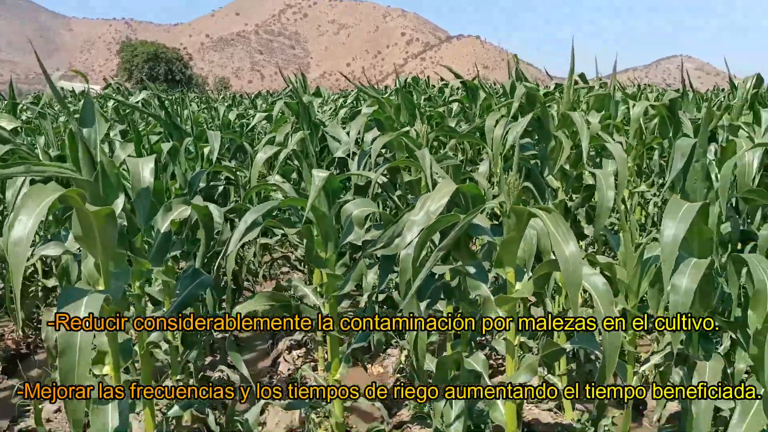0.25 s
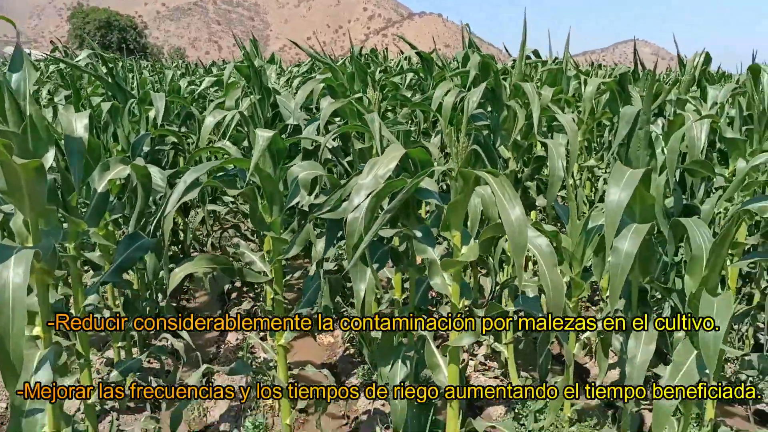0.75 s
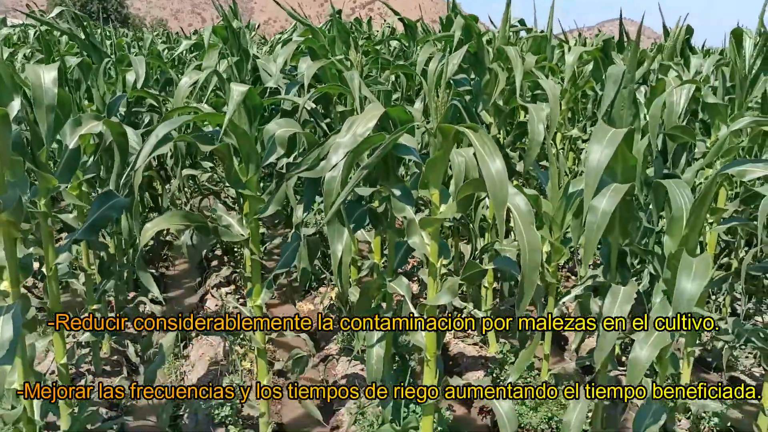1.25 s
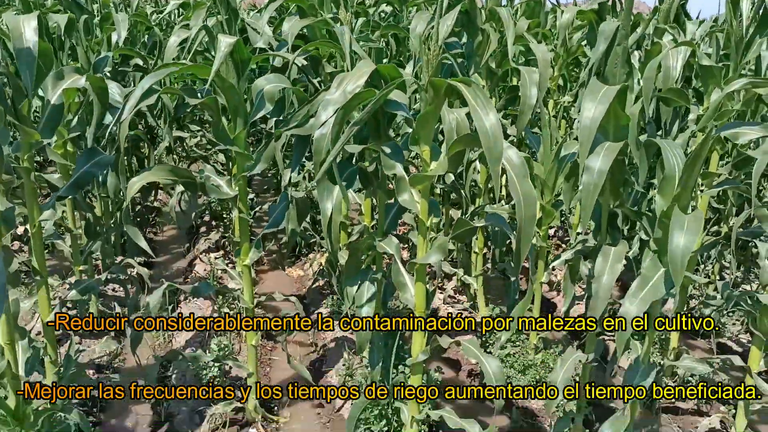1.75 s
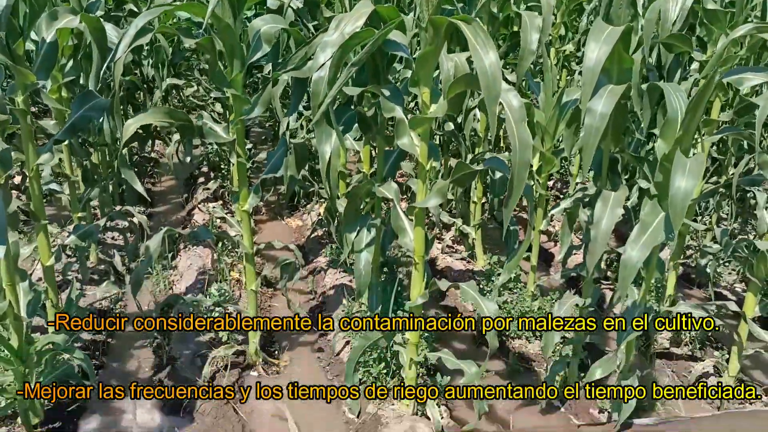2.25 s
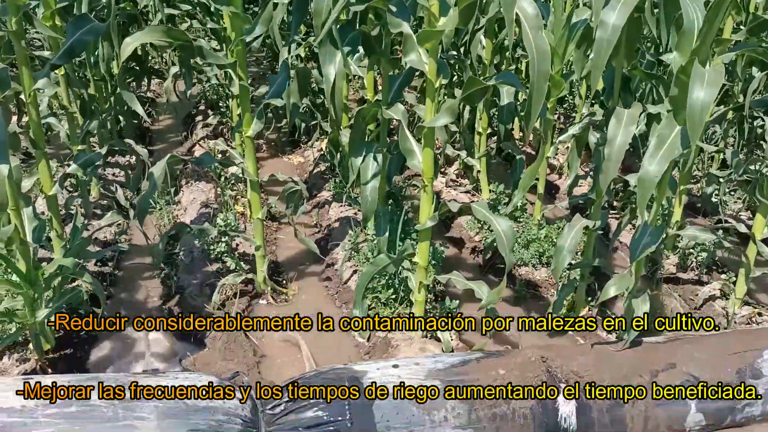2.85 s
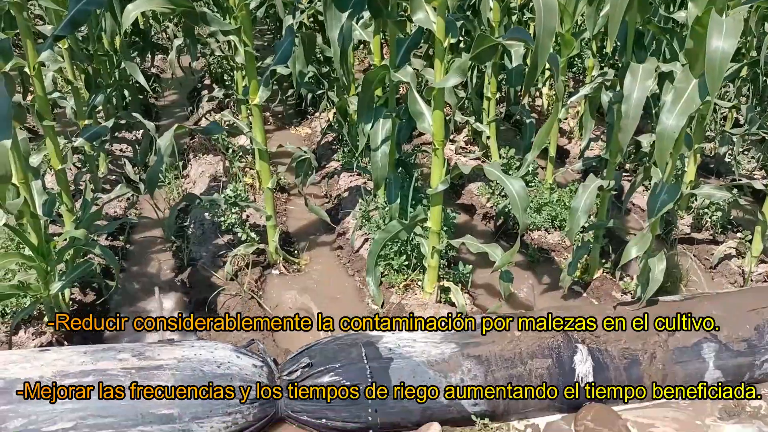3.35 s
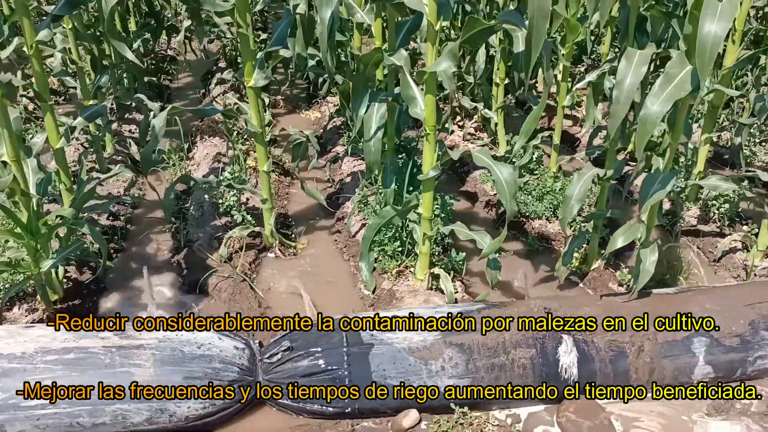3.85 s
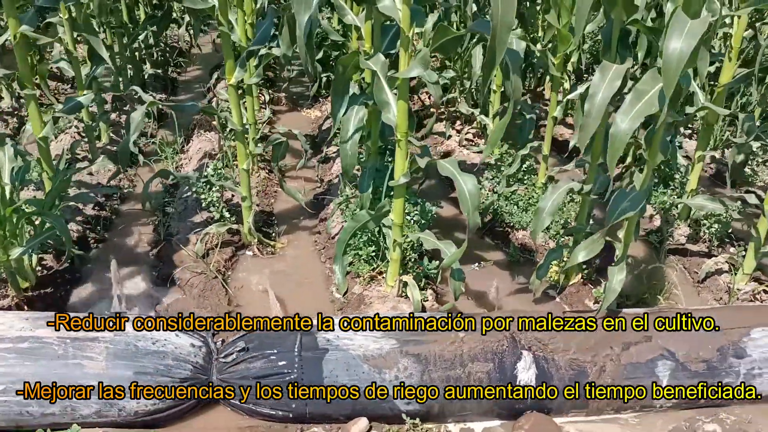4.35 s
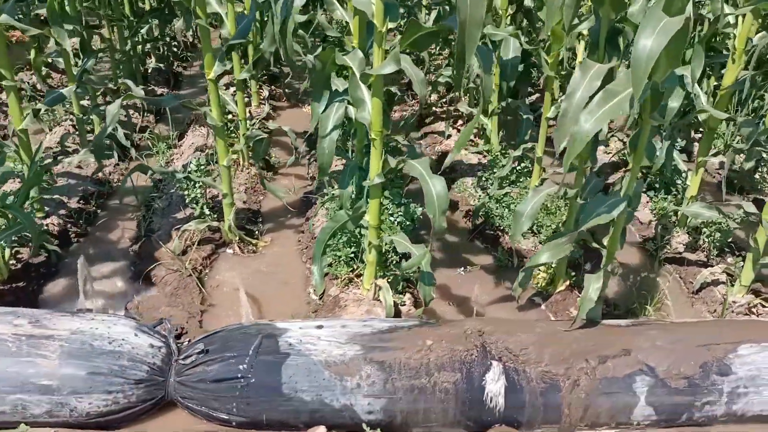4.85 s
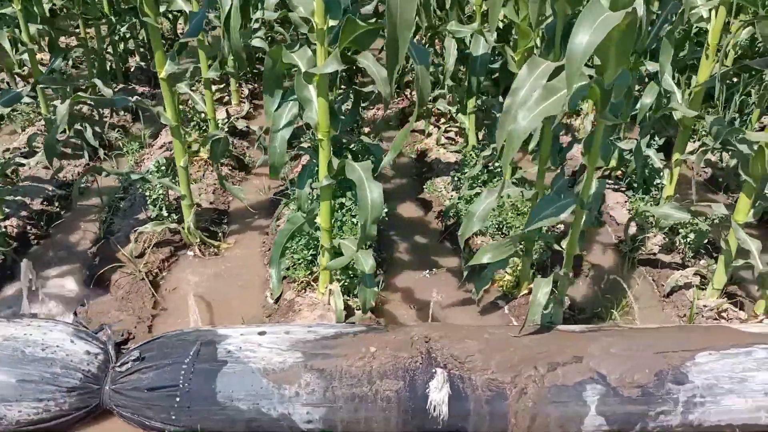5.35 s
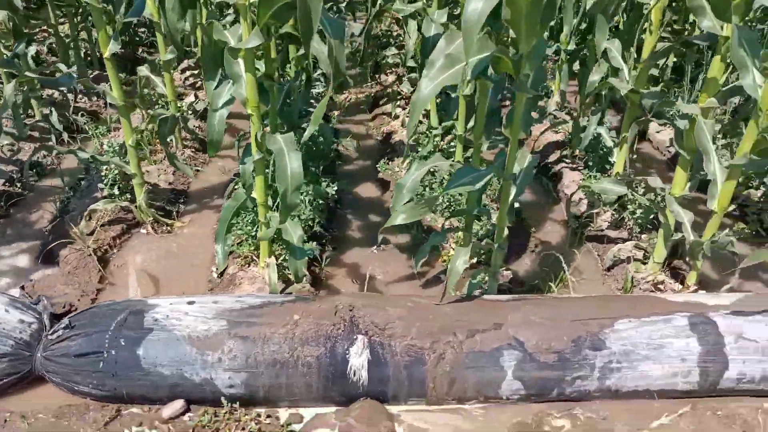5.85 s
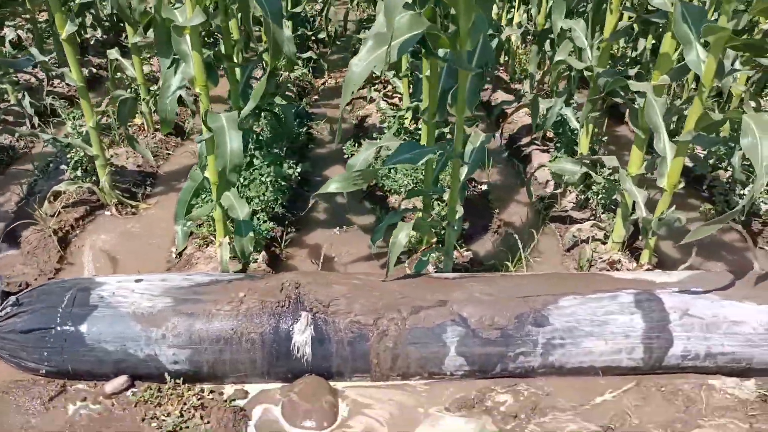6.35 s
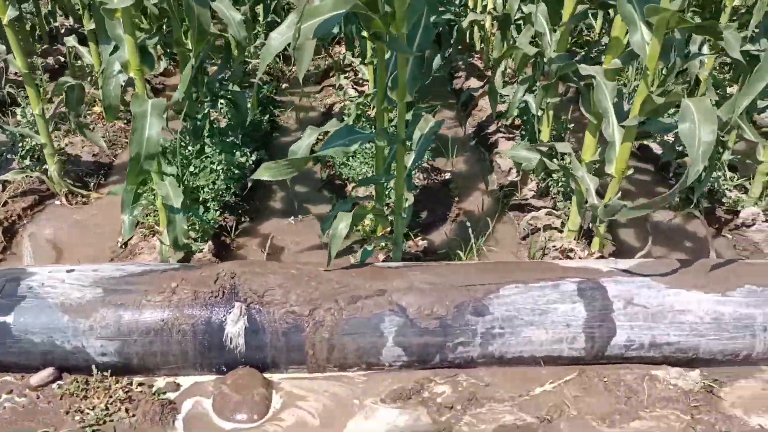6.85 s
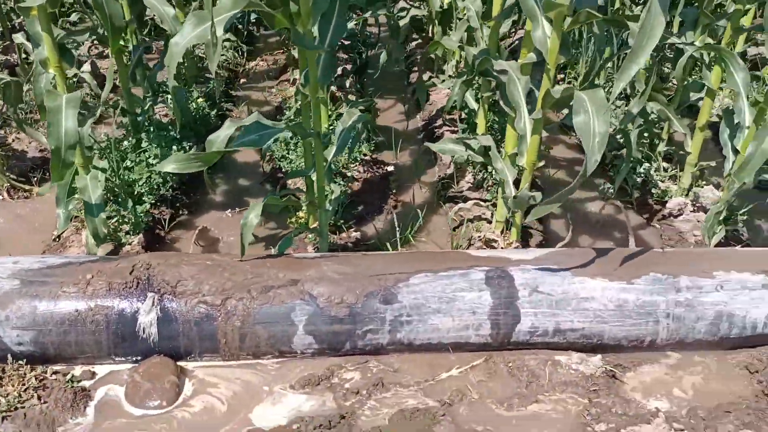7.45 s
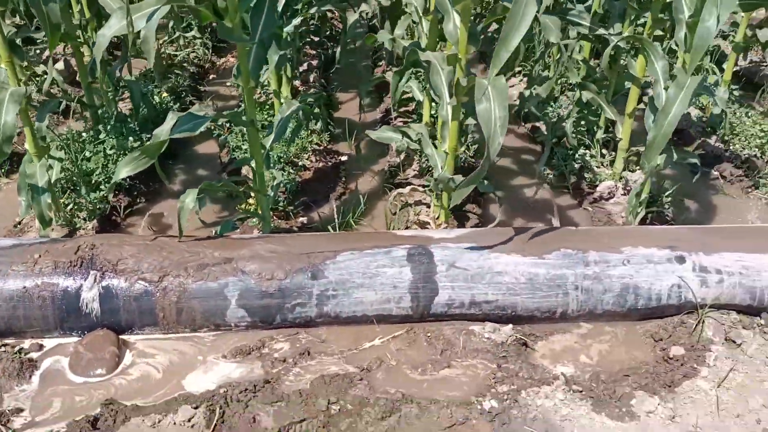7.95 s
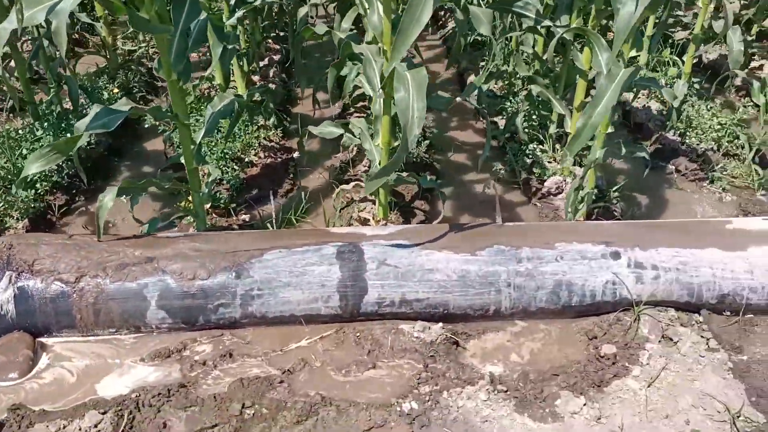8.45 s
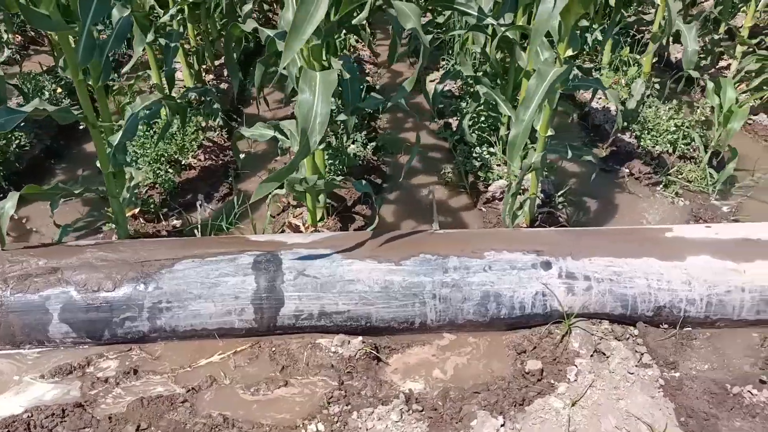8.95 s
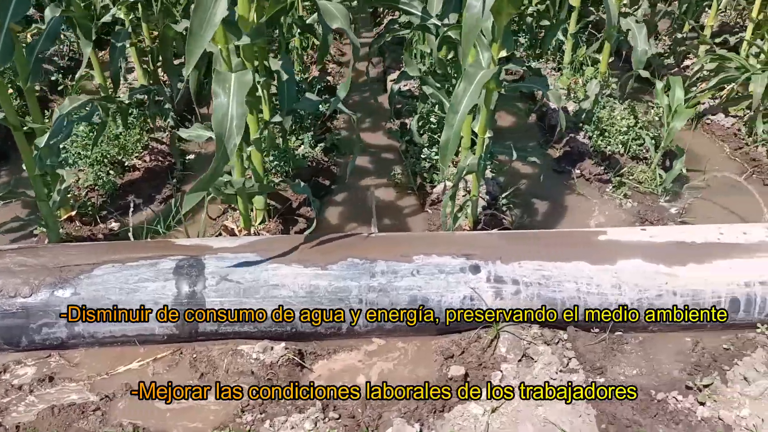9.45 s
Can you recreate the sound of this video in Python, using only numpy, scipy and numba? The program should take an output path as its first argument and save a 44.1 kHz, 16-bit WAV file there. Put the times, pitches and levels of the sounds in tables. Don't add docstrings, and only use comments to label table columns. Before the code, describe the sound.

Outdoors in a maize field, water sprays continuously from a soft irrigation pipe into muddy furrows: an even, bright hiss full of tiny ticks and trickling bubbles, with soft low gurgles beneath. Light wind flutters come early. From about five and a half to nearly eight seconds, strong gusts thud and rumble mostly in the right channel, then weaken while the water runs on. Handheld stereo phone, close, no windscreen.

```python
import sys
import numpy as np
from scipy import signal
from scipy.fft import rfft, irfft, next_fast_len
from scipy.io import wavfile
from scipy.ndimage import uniform_filter1d
from numba import njit

SR = 44100
rng = np.random.default_rng(int(sys.argv[2]) if len(sys.argv) > 2 else 0)


def dump_mix(stems):
    frames = np.atleast_2d(stems).T
    limited = np.clip(frames, -1, 1)
    pcm = np.round(limited * 32767).astype(np.int16)
    wavfile.write(sys.argv[1], SR, pcm)


def ratio_of_db(decibels):
    return 10 ** (np.asarray(decibels, float) / 20)


N = 428211
TIME = np.arange(N) / SR

# t/s, spray level/dB, spray left minus right/dB, gurgle level/dB
WATER_FLOW = [(0, -37.5, 1.5, -50), (1, -37.5, 2.5, -51), (2.4, -37, 1, -52), (3.5, -38, 1, -52.5),
              (4.5, -38, 0.5, -51.5), (5.5, -37.5, 0, -49), (6.5, -38.5, -0.5, -59), (7.5, -38, 0.5, -60),
              (8.5, -38.5, 0, -71), (9.3, -38, 0.5, -70), (9.55, -37.5, 0.5, -62), (9.71, -38, -1, -59)]
# f/Hz, level per Hz/dB
LEFT_PORT_COLOUR = [(150, -9.5), (900, -7.5), (1450, -7), (2250, 1), (2700, -2.5), (3600, -11), (4400, -8),
                    (5450, -8), (6400, -13.5), (8500, -13.5), (9600, -16.5), (12000, -15), (14500, -18),
                    (15600, -24)]
RIGHT_PORT_COLOUR = [(150, -7.5), (1000, -6.5), (1650, -9.5), (2200, -1.5), (2700, -3), (3100, 1.5),
                     (3600, -3.5), (4200, -2), (6500, -2.5), (8800, -6.5), (9800, -16), (11500, -12),
                     (14500, -18), (15600, -21)]
# f/Hz, common share/0-1
PORT_LIKENESS = [(150, 1), (700, 0.27), (1200, 0.15), (2500, 0.15), (5000, 0), (12000, 0.06)]
BREEZE_DB = (-68.5, -61)
# start t/s, hold/s, level/dB
LEFT_GUSTS = [(.2, .06, -55), (.66, 0.055, -59), (2.74, 0.26, -60), (3.42, 0.29, -51), (3.76, .08, -47),
              (3.92, .08, -55), (4.46, 0.13, -54), (4.72, 0.071, -48), (5.02, .05, -55), (5.4, 0.1, -55),
              (5.64, .06, -62), (6.44, .05, -52), (6.64, 0.066, -54), (6.86, 0.067, -39), (7.84, .14, -51),
              (8.42, .12, -45), (8.6, .2, -58), (8.84, 0.048, -47), (9.22, .1, -55), (9.6, 0.065, -57)]
RIGHT_GUSTS = [(.13, .19, -36), (.46, 0.15, -42), (.7, 0.45, -53.5), (1.25, 0.26, -44),
               (1.78, 0.023, -47.5), (2.97, .08, -46), (3.14, .3, -57), (4.3, 0.04, -42), (4.44, 0.15, -37),
               (4.65, 0.1, -43.5), (4.94, .1, -46), (5.17, .12, -40.5), (5.41, 0.25, -18.5),
               (5.75, .13, -18.5), (5.9, 0.074, -21), (6.05, 0.18, -23.5), (6.24, 0.13, -33.5),
               (6.39, 0.1, -23), (6.58, 0.19, -24), (6.84, 0.078, -42), (7.09, .24, -20),
               (7.38, 0.41, -20.5), (7.86, .2, -31), (8.44, 0.047, -36), (8.57, 0.028, -36.5),
               (8.65, 0.195, -34), (8.88, 0.16, -36.5), (9.12, 0.13, -38), (9.38, 0.11, -39.5),
               (9.53, .12, -36)]
# t/s, peak level/dB, f/Hz, length/ms
LEFT_BUFFETS = [(3.434, -35, 79, 7.6), (3.495, -28.5, 117, 5.6), (3.541, -26.5, 87.5, 8.7),
                (3.611, -35, 94, 4.7), (3.825, -31, 92.5, 8), (3.955, -21, 93, 3.7), (3.982, -32, 124, 3.3),
                (4.485, -29, 77, 12), (4.59, -31, 107, 8), (5.036, -36, 180, 4.6), (5.666, -40, 78, 11),
                (6.454, -31, 74, 7), (6.48, -27, 76, 12), (6.882, -21.5, 96, 20), (8.439, -16.5, 150, 2.3),
                (8.829, -32, 160, 4.6), (8.871, -18, 120, 7.9), (9.645, -34.5, 78.5, 21)]
RIGHT_BUFFETS = [(0.208, -22, 140, 13), (0.3, -17.5, 153, 5.3), (0.593, -23, 179, 4.5),
                 (5.556, -8.5, 151, 14), (4.456, -22, 118, 13), (4.571, -19, 152, 10), (5.426, -6, 120, 3),
                 (5.5, -5.5, 171, 12.6), (5.695, -7, 131, 2.7), (5.776, -3.5, 138, 4.5),
                 (5.802, -7, 111, 6), (5.846, -5.5, 127, 13), (6.03, -3, 192, 3.6), (6.068, -13, 164, 4.4),
                 (6.179, -6.5, 125, 13.4), (6.314, -13.5, 117, 7), (6.399, -9.5, 126, 4.6),
                 (6.435, -2.5, 159, 2.8), (6.877, -15, 84, 3.9), (7.097, -10, 134, 3.9),
                 (1.26, -25, 142, 4.7), (7.245, -7.5, 174, 4.1), (7.305, -2, 119, 4.3),
                 (7.419, -5.5, 138, 2.3), (7.482, -1, 117, 10.2), (8.036, -14, 119, 3.5),
                 (8.745, -15.5, 159, 5.4), (9.216, -15.5, 129, 4.9), (9.459, -19.5, 118, 7.3),
                 (9.543, -21, 142, 5.6)]
# f/Hz, level per Hz/dB
RUMBLE_COLOUR = [(12, -23), (30, -2.5), (50, 3), (90, -1.5), (170, -2), (250, -12), (400, -32), (700, -59),
                 (2000, -90)]
# f/Hz, level per Hz/dB
EDDY_COLOUR = [(150, 4), (280, 4.5), (450, -2.5), (600, -15), (800, -23.5), (1200, -30), (3000, -99)]
# t/s, peak level/dB, f/Hz
FAT_BUBBLES = [(0.384, -23, 626), (0.653, -23.5, 580), (0.739, -25, 615), (0.827, -22, 615),
               (1.416, -31, 590), (1.694, -27, 764), (2.076, -24, 500), (2.966, -23, 525),
               (3.196, -28, 483), (3.907, -26, 630), (4.253, -24, 824), (4.42, -32, 440), (6.911, -22, 610),
               (8.235, -27, 407), (8.812, -30, 680), (9.191, -20.5, 595), (9.315, -31, 515)]
# t/s, peak level/dB, f/Hz, left minus right/dB
NEAR_DROPS = [(0.4207, -24, 2330, 13), (1.2285, -28, 2410, 4), (1.427, -21, 4150, -11),
              (1.4973, -16, 4220, -2), (1.6714, -21, 4200, -14), (2.1235, -18, 4740, -5),
              (2.3647, -13, 5740, -5), (3.0394, -15, 3850, -12), (7.0975, -19, 5770, -13),
              (3.4006, -19, 4270, -18), (3.6249, -18, 7750, -10), (3.747, -19, 4130, -8),
              (4.1065, -13, 5680, -4), (4.6011, -21, 4240, -16), (5.269, -30, 2300, -32),
              (5.437, -23, 5430, -8), (5.563, -15, 5940, -6), (6.049, -22, 4100, -11),
              (6.2547, -19, 4220, -9), (6.7928, -21, 4570, -18), (6.9453, -18, 4450, -14),
              (7.6113, -26, 6200, -21), (7.8984, -18, 5630, -16), (7.9615, -17, 3030, -7),
              (8.541, -23.5, 1850, -1), (8.8027, -17, 5510, -6), (8.8735, -22, 4300, -23),
              (9.1338, -20, 3650, -17), (9.5222, -20, 6070, -12), (9.6585, -17.5, 4300, -13)]
# t/s, peak level/dB, f/Hz
RISING_BUBBLES = [(3.044, -31, 2160), (3.281, -25, 5250), (3.376, -25, 2350), (6.692, -25, 2420),
                  (6.726, -27, 3900), (6.829, -29, 1420), (6.917, -33, 700), (7.155, -22, 2900),
                  (7.3, -23, 1055), (7.315, -26, 3100), (8.98, -22, 4800), (9.015, -23, 2690),
                  (9.098, -27, 2010), (9.248, -26, 4100), (9.508, -26, 2380), (9.515, -31, 1230),
                  (9.54, -31, 1900)]

GUST_RISE_DB_PER_S, GUST_FALL_DB_PER_S = 371, 252
SHED_OVER_GUST_DB, SHED_SCATTER_DB = 10, -0.5
SHED_HZ, SHED_HZ_PER_DB, SHED_CYCLES = 146.6, 1.5, 0.59


def level(x, db):
    return x * ratio_of_db(db) / np.sqrt(np.mean(x ** 2))


def on_log(table, hz):
    points, values = np.transpose(table)
    return np.interp(np.log(np.maximum(hz, 1)), np.log(points), values)


def colour(x, table):
    size = next_fast_len(N)
    hz = np.arange(size // 2 + 1) * SR / size
    return irfft(rfft(x, size) * ratio_of_db(on_log(table, hz)), size)[..., :N]


def walk(rate):
    hold = int(SR / rate)
    steps = np.repeat(rng.standard_normal(N // hold + 1), hold)
    return 1.3 * uniform_filter1d(uniform_filter1d(steps, hold), hold)[:N]


def ripple(rate):
    quick = walk(rate)
    return quick - uniform_filter1d(quick, SR // 8)


@njit
def ring(n, start, hz, cycles, glide, size):
    out = np.zeros(n)
    for g in range(len(start)):
        step = 2j * np.pi * hz[g] / SR
        z = size[g] + 0j
        turn = np.exp(step - hz[g] / (cycles[g] * SR))
        rise = np.exp(step * glide * hz[g] / SR)
        for i in range(int(5 * cycles[g] * SR / hz[g])):
            j = start[g] + i
            z *= turn
            turn *= rise
            if 0 <= j < n:
                out[j] += z.imag * min(1., i * hz[g] / SR)
    return out


def bubbles(s, db, hz, cycles, pan_db, lag, glide):
    start = (s * SR).astype(np.int64)
    late = start + np.round(lag).astype(np.int64)
    hz = np.clip(hz, 100, .45 * SR)
    cycles = cycles * np.ones(len(s))
    left = ring(N, late, hz, cycles, glide, ratio_of_db(db + pan_db / 2))
    right = ring(N, start, hz, cycles, glide, ratio_of_db(db - pan_db / 2))
    return np.array([left, right])


def swarm(count, lo_hz, hi_hz, cycles, scatter_db, spread_db, lag, wander, glide):
    chance = rng.random((count, 6)).T
    splash = np.arange(count) // 3
    s = chance[0][splash] * N / SR + .001 * chance[5]
    hz = lo_hz * (hi_hz / lo_hz) ** chance[1]
    db = -scatter_db * np.log(chance[2][splash] + 0.03) + 10 * np.log10(hz / lo_hz)
    pan, distance = 2 * chance[3:5, splash] - 1
    cycles = cycles * (.5 + chance[4])
    return bubbles(s, db, hz, cycles, spread_db * pan, lag + wander * distance, glide)


def hiss(surge_db, near_db, flicker_db, lag):
    size = next_fast_len(N)
    hz = np.arange(size // 2 + 1) * SR / size
    like = np.clip(on_log(PORT_LIKENESS, hz), 0, 1)
    common, left, right = rfft(rng.standard_normal((3, size)))
    delay = np.exp(-2j * np.pi * hz * lag * np.clip(hz / 1600, .25, 1) / SR)
    shared = common * np.array([delay, np.ones_like(delay)])
    pair = np.sqrt(like) * shared + np.sqrt(1 - like) * np.array([left, right])
    out, surge, near = 0, ripple(90), ripple(75)
    for octave in np.arange(7, 14.5, .5):
        away = np.clip(np.log2(np.maximum(hz, 1)) - octave, -.5, .5)
        band = np.cos(np.pi * away) ** 2
        near = .75 * near + .66 * ripple(75)
        own = ripple(120)
        depth = 2.42 + 0.017 * (octave - 23.5)
        sway = ratio_of_db((surge_db * surge + near_db * near + flicker_db * own) * depth)
        out = out + irfft(pair * band, size)[:, :N] * level(sway, 0)
    return out


def spray(spray_db, pan_db):
    far = hiss(surge_db=0.26, near_db=0.3, flicker_db=0.69, lag=23.7)
    fizz = swarm(count=9000, lo_hz=1517, hi_hz=13400, cycles=6.9, scatter_db=4.0,
                 spread_db=14, lag=26, wander=8.2, glide=0.053)
    trickle = swarm(count=2200, lo_hz=1310, hi_hz=9080, cycles=14, scatter_db=3.5,
                    spread_db=3, lag=26, wander=9, glide=0.003)
    crackle = swarm(count=4500, lo_hz=4500, hi_hz=15500, cycles=0.75, scatter_db=2.7,
                    spread_db=3, lag=26, wander=7.9, glide=0.)
    mix = level(far, 0) + level(fizz, -15.5) + level(trickle, -14) + level(crackle, -11)
    heard = np.array([colour(mix[0], LEFT_PORT_COLOUR), colour(mix[1], RIGHT_PORT_COLOUR)])
    return level(heard, 2.23) * ratio_of_db(spray_db + np.array([pan_db, -pan_db]) / 2)


def gurgle(gurgle_db):
    large = swarm(count=6000, lo_hz=428, hi_hz=755, cycles=2.6, scatter_db=1.0,
                  spread_db=-5.0, lag=6.5, wander=3.0, glide=0.035)
    return level(large, 0) * ratio_of_db(gurgle_db)


def gusts(table, calm_db):
    power = ratio_of_db(2 * calm_db)
    for s, hold_s, db in table:
        rise_db = GUST_RISE_DB_PER_S * np.maximum(s - TIME, 0)
        fall_db = GUST_FALL_DB_PER_S * np.maximum(TIME - s - hold_s, 0)
        power = power + ratio_of_db(2 * (db - rise_db - fall_db))
    return 10 * np.log10(power)


def shed(gust_db, count):
    chance = rng.random((count, 4)).T
    s = (np.arange(count) + chance[0]) * N / SR / count
    gust_now_db = gust_db[np.minimum(s * SR, N - 1).astype(np.int64)]
    db = gust_now_db + SHED_OVER_GUST_DB + SHED_SCATTER_DB * (2 * chance[1] - 1)
    hz = (SHED_HZ + SHED_HZ_PER_DB * db) * (0.7 + .5 * chance[2])
    ms = SHED_CYCLES * (.5 + chance[3]) * 1000 / hz
    return list(zip(s, db, hz, ms))


def blows(buffets, eddies):
    out = np.zeros(N)
    around = np.arange(-4000, 4000)
    t = around / SR
    for (s, db, hz, ms), turn in zip(buffets, rng.random(len(buffets))):
        at = np.clip(int(s * SR) + around, 0, N - 1)
        cycle = hz * t * (1 - 12 * np.clip(t, -.02, .02)) + turn
        swing = np.cos(2 * np.pi * cycle) / np.cosh(t * 1700 / ms)
        fray = ratio_of_db(0.56 * db - 8.5) * eddies[at] / np.cosh(t * 1000 / ms)
        out[at] += ratio_of_db(db - 0.5) * (swing + fray)
    return out


def wind(gust_db, buffets):
    lumps = ripple(45)
    eddies = level(colour(rng.standard_normal(N), EDDY_COLOUR), 0)
    rumble = level(colour(rng.standard_normal(N), RUMBLE_COLOUR), 0)
    rumble = rumble * ratio_of_db(gust_db - 0.051 * (gust_db + 36) + 3.6 * lumps + 2.5)
    growth_db = 0.86 * (gust_db + 19.5)
    whip = eddies * ratio_of_db(gust_db + growth_db - 9.0 + 3.1 * lumps + 1.7 * walk(60))
    return rumble + whip + blows(buffets, eddies)


def plops():
    s, db, hz = np.transpose(FAT_BUBBLES)
    return bubbles(s, db - 9.0, hz, cycles=3.2, pan_db=0, lag=8, glide=0.019)


def drops():
    s, db, hz, pan = np.transpose(NEAR_DROPS)
    body = bubbles(s, db + 4.5, hz, 1.5, pan, lag=26, glide=0.014)
    tick = bubbles(s, db - 7, 1.7 * hz, 0.7, pan, lag=26, glide=0.)
    return body + tick + bubbles(s, db - 6, 2.6 * hz, .6, pan, lag=26, glide=0.)


def chirps():
    s, db, hz = np.transpose(RISING_BUBBLES)
    return bubbles(s, db, hz, cycles=8.8, pan_db=-1.5, lag=22, glide=0.021)


def scene():
    s, *columns = np.transpose(WATER_FLOW)
    spray_db, pan_db, gurgle_db = [np.interp(TIME, s, column) for column in columns]
    water = spray(spray_db, pan_db) + gurgle(gurgle_db) + plops() + drops() + chirps()
    left_db, right_db = gusts(LEFT_GUSTS, BREEZE_DB[0]), gusts(RIGHT_GUSTS, BREEZE_DB[1])
    left = wind(left_db, LEFT_BUFFETS + shed(left_db, count=120))
    right = wind(right_db, RIGHT_BUFFETS + shed(right_db, count=260))
    return water + np.array([left, right])


def band_limit(x):
    return signal.sosfilt(signal.butter(12, 15560, fs=SR, output="sos"), x)


def record(dry):
    rounded = 1.055 * np.tanh(dry / 1.132)
    return band_limit(rounded)


dry = scene()
out = record(dry)
dump_mix(out)
```